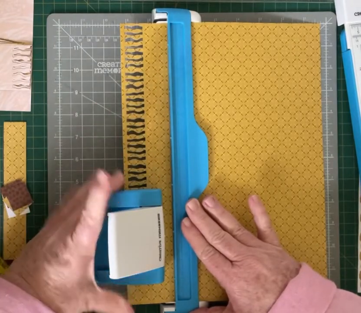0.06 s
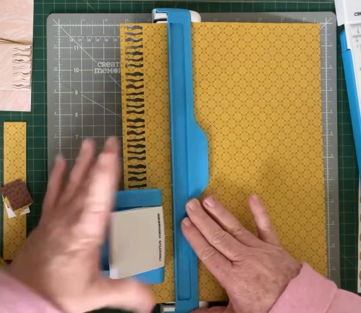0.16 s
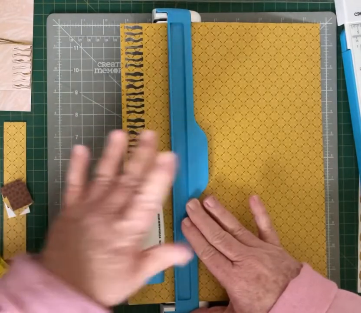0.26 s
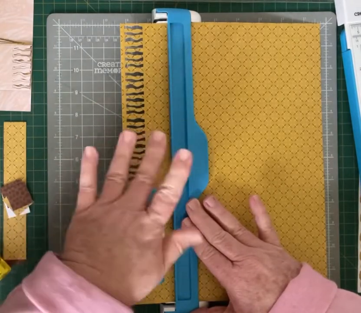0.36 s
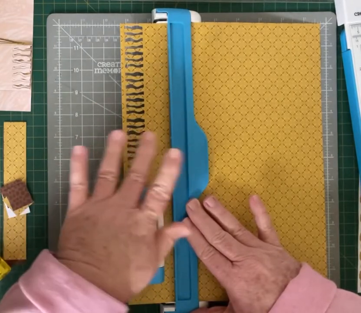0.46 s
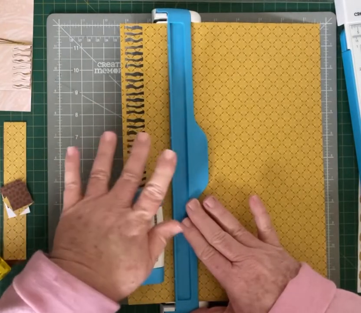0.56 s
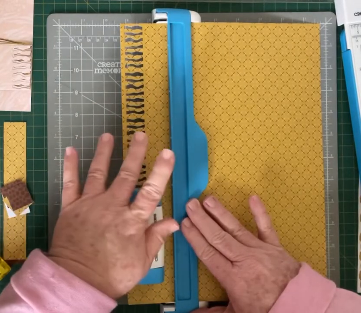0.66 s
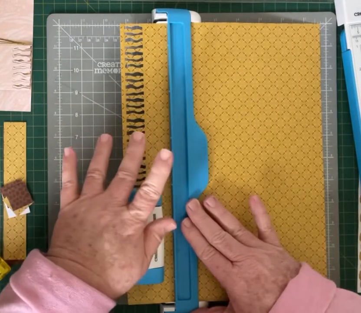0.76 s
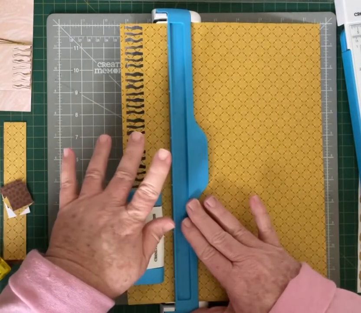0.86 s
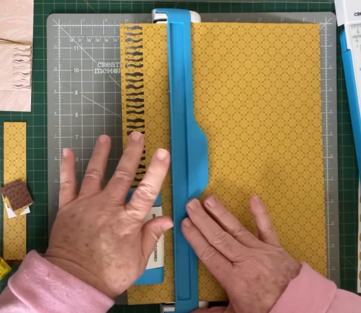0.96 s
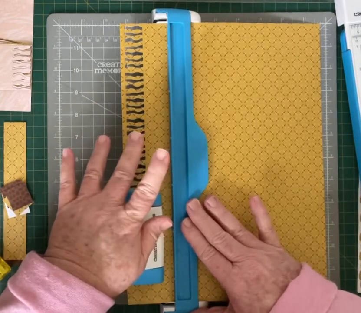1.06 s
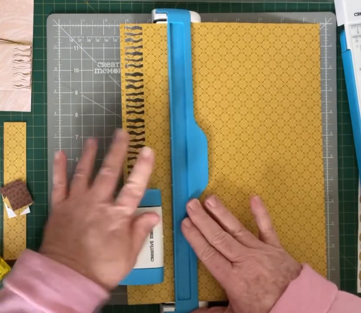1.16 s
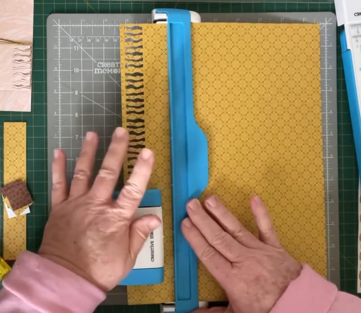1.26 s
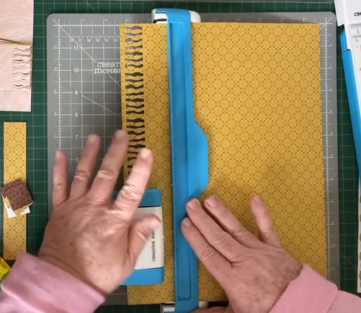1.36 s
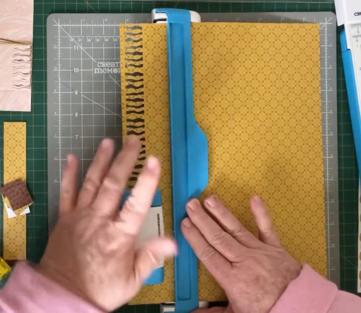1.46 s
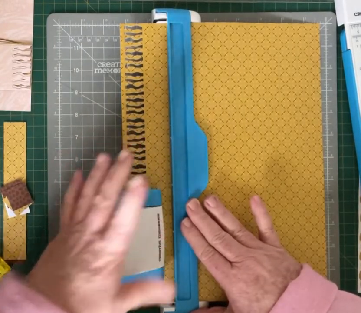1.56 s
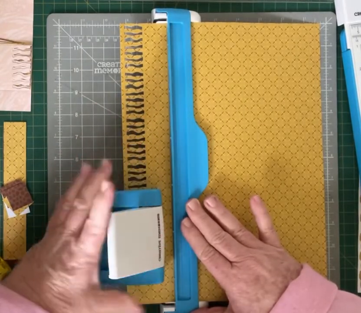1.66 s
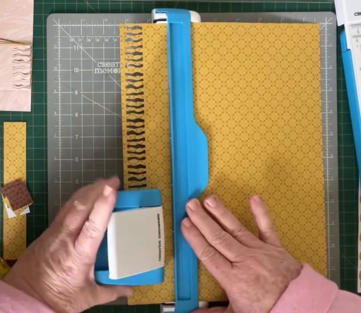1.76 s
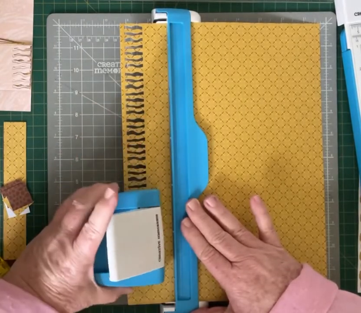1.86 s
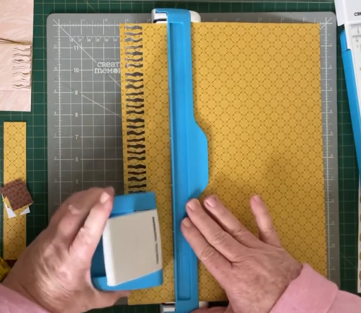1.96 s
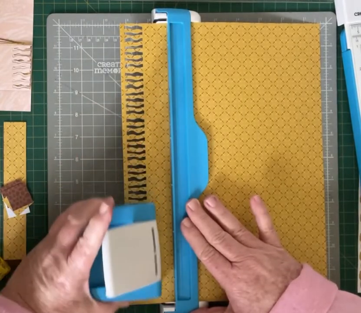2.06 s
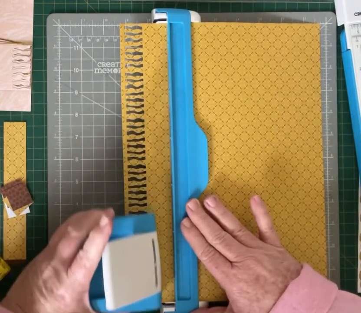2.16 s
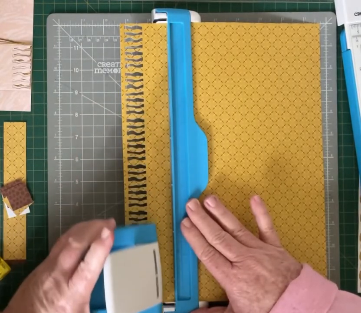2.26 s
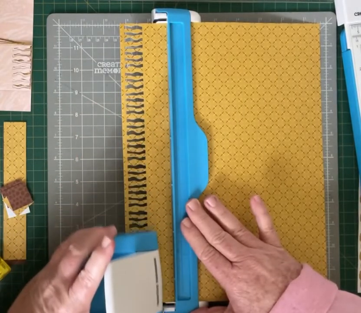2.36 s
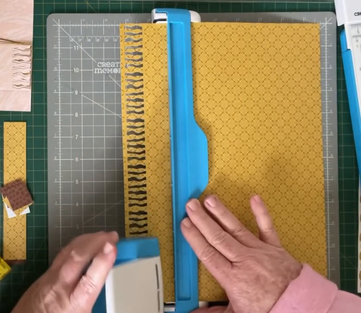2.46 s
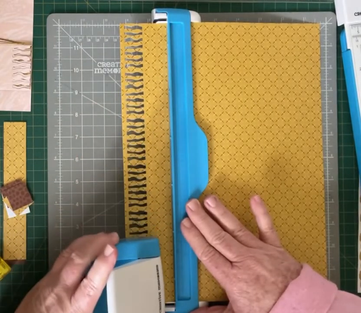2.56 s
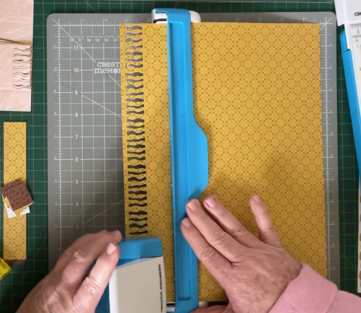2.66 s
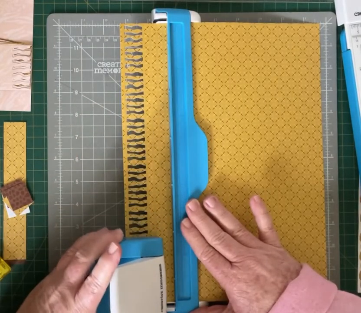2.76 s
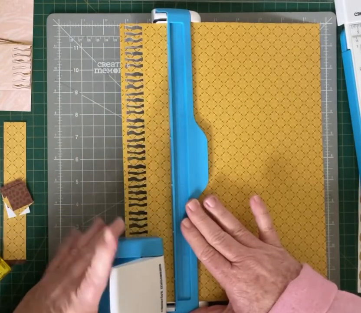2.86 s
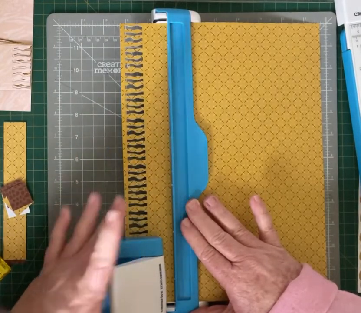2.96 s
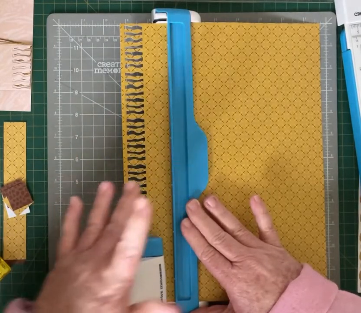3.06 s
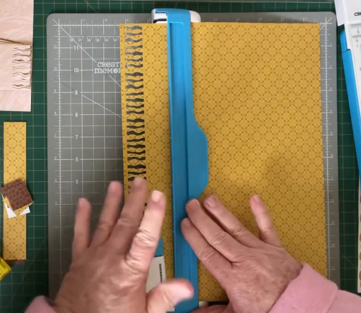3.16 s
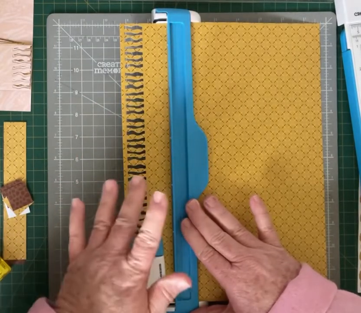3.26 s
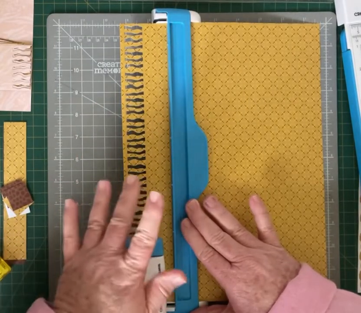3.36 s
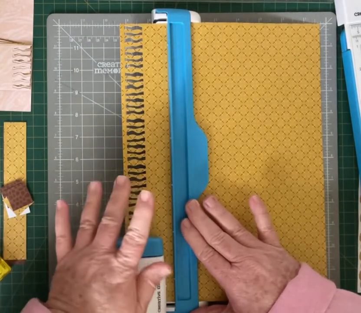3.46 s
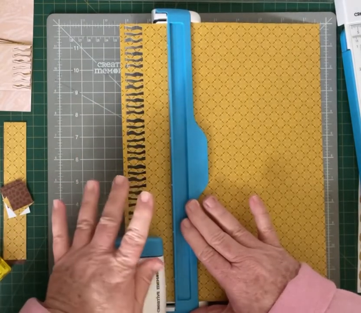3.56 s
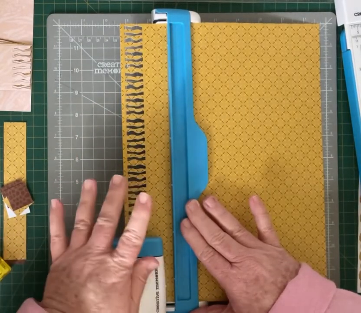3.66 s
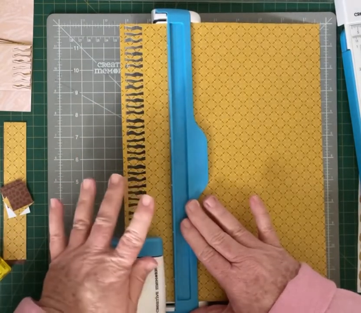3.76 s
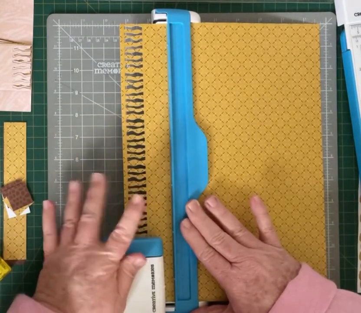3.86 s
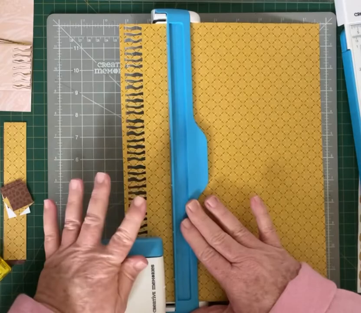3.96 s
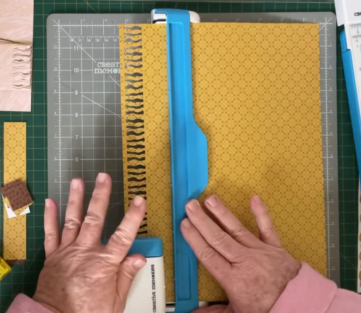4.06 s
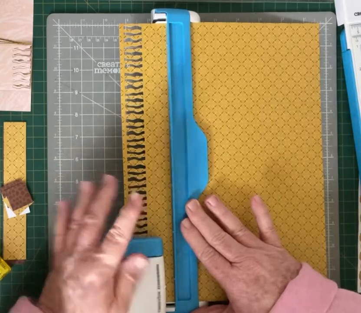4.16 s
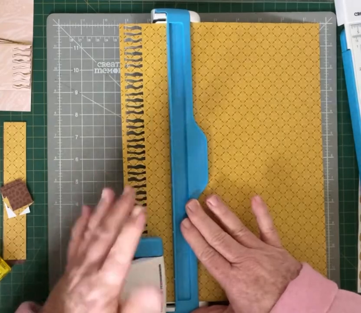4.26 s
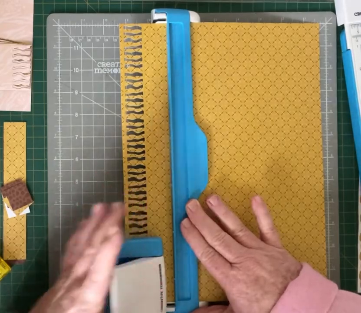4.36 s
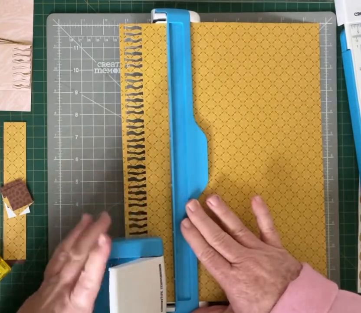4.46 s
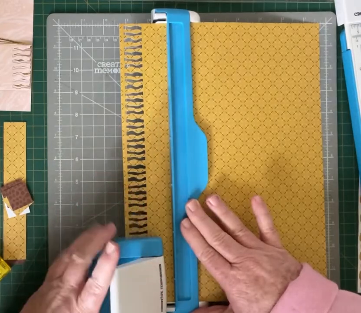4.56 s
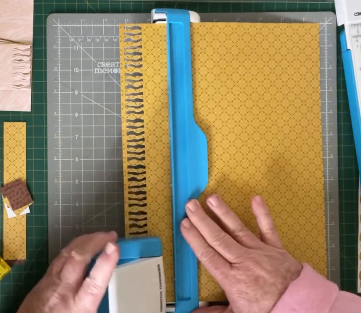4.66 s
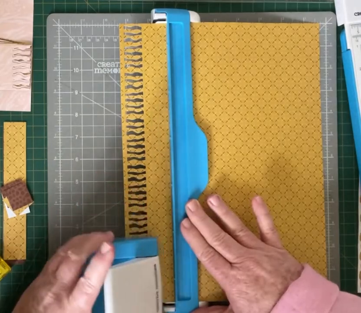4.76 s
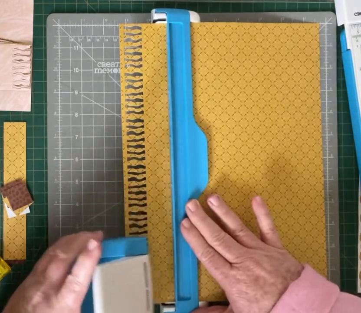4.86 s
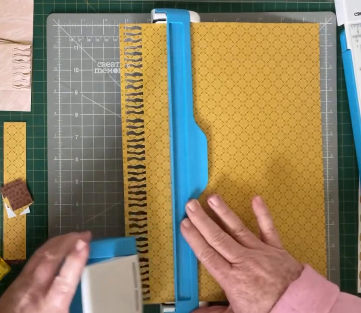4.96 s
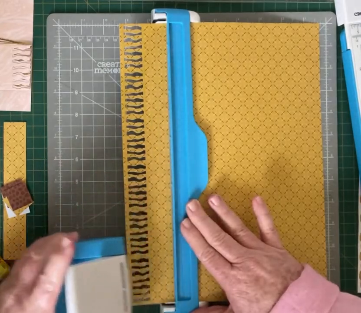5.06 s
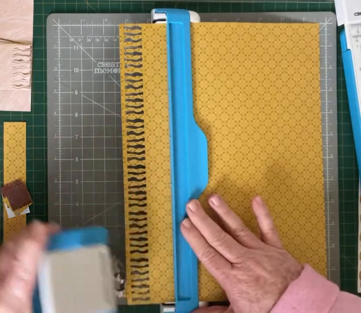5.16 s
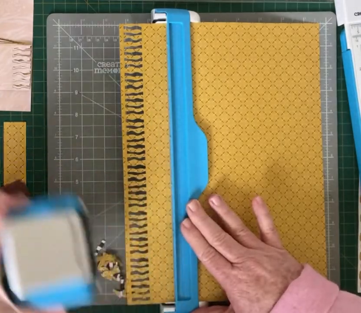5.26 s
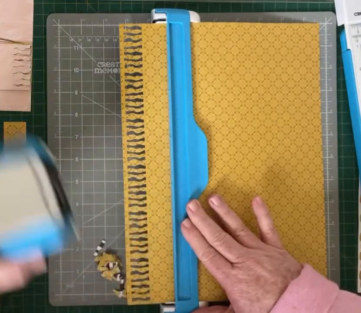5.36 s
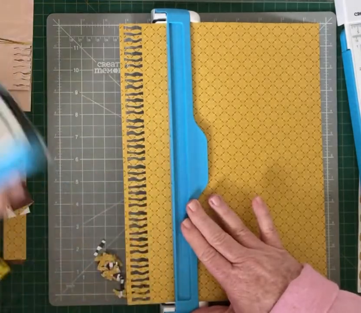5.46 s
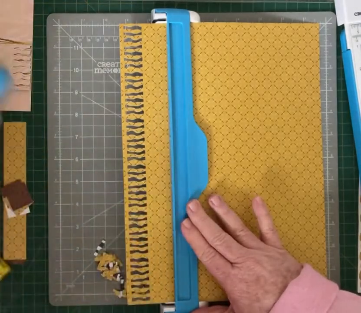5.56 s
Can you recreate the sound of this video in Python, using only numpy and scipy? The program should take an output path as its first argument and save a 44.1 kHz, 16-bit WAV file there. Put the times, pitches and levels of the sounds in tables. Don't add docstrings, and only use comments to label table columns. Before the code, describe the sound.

A plastic hand punch crunches through card twice with loud sharp snaps, amid soft palm knocks, spring ticks, paper rubbing and sliding on a table.

```python
import sys
import numpy as np
from scipy import signal
from scipy.fft import rfft, irfft
from scipy.io import wavfile
from scipy.ndimage import uniform_filter1d

SR = 44100
rng = np.random.default_rng(int(sys.argv[2]) if len(sys.argv) > 2 else 0)


def bounce(signal):
    frames = np.transpose(np.atleast_2d(signal))
    limited = np.clip(frames, -1, 1)
    pcm = np.round(limited * 32767).astype(np.int16)
    wavfile.write(sys.argv[1], SR, pcm)


def invert_db(x):
    u = np.asarray(x, float) / 20
    return 10 ** u


N = 246823

# pitch_hz, level_db
AIR_COLOUR = [(150, -30), (250, -1), (700, -4), (1300, -9), (2500, -14), (5000, -24), (8000, -32),
              (16000, -41)]
# start_s, level_db
SHAKE_LEVEL = [(0.0, -57), (0.28, -61.5), (0.5, -47), (1.05, -58), (1.26, -51.5), (1.431, -46),
               (1.52, -65.5), (1.74, -61.5), (2.09, -53), (2.352, -51.5), (2.93, -60), (3.19, -59.5),
               (3.52, -48), (3.79, -60), (3.98, -49), (4.36, -58.5), (4.52, -57.5), (5.6, -63.5)]
# pitch_hz, level_db
SHAKE_COLOUR = [(15, -71.5), (25, -39.5), (46, -6), (59, 5.5), (75, 6.5), (92, -4.5), (139, 0.5),
                (168, -12.5), (352, -20.5), (452, -19), (500, -23), (650, -52.5), (1100, -120)]
# pitch_hz, t60_s
ROOM_DECAY = [(250, 0.31), (660, 0.17), (1740, 0.23), (4590, 0.26), (12100, 0.2)]
# pitch_hz, level_db
ROOM_COLOUR = [(200, -3), (700, 1.5), (2000, -1.5), (5000, 3.5), (12000, -1)]
# pitch_hz, level_db, t60_s
TABLE_MODES = [(71.4, -11, 0.04), (85, 2, 0.05), (130.7, 5.5, 0.18), (183, -7.5, 0.18), (241, -13, 0.22),
               (346, -5.5, 0.11)]
# start_s, peak_s, end_s, dull_db, bright_db
RUBS = [(0.423, 0.463, 0.43, -45, -51.5), (0.496, 0.516, 0.64, -47.5, -57), (0.528, 0.6, 0.63, -52, -60.5),
        (0.674, 0.694, 0.74, -45.5, -56.5), (0.78, 0.802, 0.89, -55, -57.5), (1.23, 1.23, 1.306, -47, -72),
        (1.296, 1.316, 1.39, -49.5, -58), (1.325, 1.354, 1.36, -47, -49),
        (1.34, 1.385, 1.465, -48.5, -48.5), (2.165, 2.193, 2.18, -49, -56), (2.384, 2.407, 2.47, -54, -57),
        (3.368, 3.39, 3.51, -54.5, -67), (3.485, 3.495, 3.66, -46.5, -56), (3.51, 3.544, 3.55, -49, -54.5),
        (3.588, 3.616, 3.65, -48.5, -53), (3.705, 3.722, 4.1, -59.5, -70), (1.059, 1.07, 1.06, -51, -58),
        (4.054, 4.07, 4.15, -54, -50), (4.085, 4.097, 4.145, -49, -44), (4.095, 4.153, 4.23, -50, -52.5),
        (4.34, 4.36, 4.35, -53.5, -76), (4.53, 4.545, 4.46, -59, -76), (4.63, 4.65, 4.718, -50.5, -75),
        (3.1, 3.11, 3.15, -61.5, -76), (4.953, 4.952, 5.06, -69, -54), (4.958, 4.983, 5, -76, -49),
        (5.01, 5.063, 5.07, -61, -60)]
# pitch_hz, level_db
RUB_COLOUR = [(88, -35), (150, -6.5), (414, -5), (774, 1.5), (1290, -10.5), (1480, 2), (1690, -3),
              (2220, -3.5), (7470, -17), (14000, -29), (16000, -33.5)]
# start_s, time_to_full_speed_s, end_s, dull_db, bright_db
SLIDES = [(0.93, 0.034, 1.17, -70, -74), (1.869, 0.1, 2.47, -59.5, -70), (2.3, 0.082, 2.76, -64, -71),
          (3.4, 0.033, 3.46, -61, -77), (3.9, 0.035, 4.094, -66, -80), (4.699, 0.11, 5.15, -72, -66)]
# pitch_hz, level_db
SLIDE_COLOUR = [(100, -40), (250, -15), (700, -1), (1600, 0), (2500, -4), (4000, -7.5), (7000, -15.5),
                (16000, -33)]
# start_s, fastest_s, end_s
LONG_SLIDES = [
    (1.93, 2.16, 2.35),
    (4.72, 4.85, 5.1),
    (2.5, 2.6, 2.92),
]
# start_hz, end_hz, width_hz, level_db
HOLLOWS = [
    [(1800, 1460, 460, -63), (3000, 4200, 700, -62.5), (5800, 5600, 400, -71)],
    [(1650, 1800, 500, -73.5), (3610, 3600, 440, -77), (5000, 5300, 500, -81), (7300, 8060, 810, -71.5),
     (10400, 9400, 900, -73)],
    [(453, 440, 51.2, -64.5), (700, 680, 63, -70.5)],
]
# start_s, peak_db, pitch_hz
BUMPS = [(1.3925, -32.5, 270), (1.3, -39, 120), (1.123, -17, 140), (1.105, -27, 370), (3.811, -16.5, 150),
         (3.4, -42.5, 260), (4.575, -46.5, 105), (4.644, -39, 316), (4.3, -44, 250), (4.3, -41, 265),
         (3.3, -45, 330), (4.036, -44.5, 210), (3.397, -41, 150), (0.57, -42, 340), (0.53, -41, 150),
         (3.8155, -19, 120)]
# start_s, peak_db, centre_hz, contact_s
TICKS = [(1.278, -40, 7000, 0.00065), (1.2845, -36, 2470, .001), (1.2875, -36.5, 3980, 0.00098),
         (1.3105, -33, 3500, 0.0011), (1.3155, -26.5, 4500, 0.00086), (1.255, -51, 3000, .003),
         (4.045, -46, 5000, 0.0018), (4.0545, -36, 4000, 0.00089), (4.063, -26.5, 3500, .001),
         (4.0695, -32, 3500, .001), (4.126, -37, 6990, .001), (4.16, -47, 10000, .002),
         (4.957, -49, 7810, .002), (4.978, -40, 7500, .002), (5.061, -52, 2593, .001),
         (3.5115, -30, 1700, 0.0011), (4.539, -54.5, 2500, .003), (0.335, -49.5, 2420, 0.0052),
         (0.364, -51, 2500, 0.0037), (0.384, -49.5, 2500, .004), (0.394, -51, 2700, .003),
         (0.41, -53, 2494, 0.0037), (3.575, -45, 700, 0.0045), (3.955, -47, 700, .005),
         (5.342, -64.5, 2000, .003)]
# start_s, peak_db
TOUCHES = [
    (0.299, -50),
    (0.311, -49),
    (0.336, -52),
    (0.364, -55),
    (0.384, -51),
    (0.409, -53),
]
# start_s, peak_db
FLICKS = [
    (4.955, -63.5),
    (4.977, -58),
    (5.059, -58),
]
# start_s, peak_db, shell_hz, edge_db
PRESSES = [(0.439, -39.5, 594, 4.5), (0.452, -36.5, 570, -11), (0.51, -31.5, 1470, -19),
           (0.519, -38.5, 400, -2), (0.536, -28, 1810, -9), (0.567, -42, 1200, 4.5),
           (0.597, -35.5, 1410, -23), (0.671, -34, 1350, -15), (0.695, -37.5, 2020, -16),
           (0.713, -36, 635, -20), (0.804, -39, 1580, -20), (0.821, -34, 810, -7.5),
           (0.868, -44.5, 1540, -3), (0.908, -44, 2200, -10), (0.965, -47, 1600, 1.5),
           (3.339, -45, 602, -10), (3.381, -34, 712, -3), (3.382, -32, 2950, -17), (3.399, -39, 2950, -30),
           (3.432, -41.5, 546, -8), (3.455, -40, 830, -7), (3.486, -39.5, 2700, -8),
           (3.509, -30.5, 1430, -11), (3.534, -38, 1400, -5), (3.554, -39.5, 1353, -17),
           (3.612, -39.5, 1845, 0), (3.627, -39, 1420, -10), (3.718, -44, 523, -31)]
# start_s, peak_db, shell_hz, edge_db
NUDGES = [(1.716, -64, 677, 3.5), (1.765, -43, 786, -19), (2.399, -46, 1160, -6), (2.569, -33, 680, -5.5),
          (3.183, -50, 710, -23.5), (4.521, -55, 650.2, -18.5), (4.538, -44.5, 648, -14),
          (4.625, -48, 808, -2), (5.539, -56.5, 847, -13.5), (4.357, -40.5, 448, -21),
          (4.368, -42, 753.9, -16), (4.645, -37.5, 603, -18), (4.66, -43, 496, -16),
          (4.682, -48.5, 700, -14)]
# start_s, peak_db, shell_hz, edge_db
RETURNS = [(1.234, -30, 730, -27), (1.244, -37, 445, -27), (1.286, -41, 770, -8), (1.31, -37, 2200, 0),
           (1.315, -35.5, 2210, -1), (1.352, -32, 2920, -16), (1.377, -28, 910, -18),
           (1.393, -33.5, 560, -12), (1.418, -34, 750, -13.5), (4.053, -35.5, 790, -4),
           (4.063, -34.5, 860, 1.5), (4.071, -40.5, 790, -14), (4.079, -40.5, 700, -16),
           (4.16, -40.5, 706, -10), (4.092, -39, 1932, 3.5), (4.147, -33.5, 780, -4.5)]
# start_s, peak_db, thump_db, contact_s
SEATS = [
    (2.189, -33.5, -13, 0.0036),
    (2.302, -17.5, -45, 0.0014),
    (2.444, -21, -24.5, 0.003),
    (3.102, -46.5, -13, 0.0041),
    (4.347, -39.5, -7, 0.0041),
    (4.557, -35.5, -17, 0.0033),
    (4.635, -34.5, -7.5, 0.0029),
]
# pitch_hz, level_db
SEAT_COLOURS = [
    [(180, -36.5), (300, -10), (703, 7), (1650, 2), (2210, -3.5), (2690, -15), (3860, -5.5), (15000, -30.5)],
    [(180, -48), (300, -16), (2440, 1.5), (3270, -17), (4320, -4.5), (5010, -5), (7920, -9), (9330, -10.5),
     (15000, -11.5)],
    [(180, -45), (300, -14), (541, -3), (1170, -3.5), (1850, -8.5), (2600, -11), (4250, -18.5),
     (5530, -18.5), (15000, -43)],
    [(180, -42), (300, 3), (2000, 3.5), (2560, 2), (3020, -11), (3440, 0), (15000, -30)],
    [(180, -42), (300, 0.5), (841, -0.5), (2280, -6.5), (4250, -20), (5350, -19), (9330, -35),
     (15000, -72.5)],
    [(180, -29), (300, -25), (577, 3), (1150, -16.5), (2600, -9.5), (3170, -26), (3790, -22),
     (15000, -52.5)],
    [(180, -37), (300, -13.5), (841, 1.5), (1210, -13), (1520, 5), (1850, -7.5), (5260, -20.5),
     (15000, -56)],
]
# pitch_hz, width_hz, level_db
SEAT_RINGS = [
    [(700, 150, 2.5), (1660, 240, -3.5), (2200, 200, -3)],
    [(1600, 410, -3.8), (2600, 330, -2), (4440, 640, -3.5), (5390, 180, -9), (6380, 200, -6),
     (7760, 190, -4)],
    [(560, 130, -5), (830, 220, 4), (1140, 76, -1), (2600, 170, -11), (5660, 210, -20)],
    [(1180, 280, -4), (2580, 360, 1), (3500, 170, -5), (5420, 120, -10)],
    [(840, 170, 0.5), (1470, 159.7, -2), (2190, 220, -7), (5230, 200, -16.5)],
    [(635, 110, 1), (1660, 110.5, -8), (2570, 130, -9), (3730, 229, -21)],
    [(850, 180, 1), (1476, 140, -3), (2240, 170, -5), (5200, 180, -20)],
]
# start_s, level_db, boom_db
BITES = [
    (1.073, -24, -1.5),
    (1.083, -27, -5),
    (1.0945, -23, -6),
    (1.103, -27, -4),
    (3.767, -24, -11.5),
    (3.775, -28, -6.5),
    (3.781, -27.5, -3.5),
    (3.7895, -26, 6),
    (3.795, -29, 8),
]
# pitch_hz, level_db
BITE_COLOUR = [(120, -44), (200, -14.5), (558, 1), (1100, -10), (1250, -4), (1480, -9.5), (2860, -11),
               (5130, -23), (6170, -19.5), (8420, -28), (16000, -31.5)]
# pitch_hz, level_db, t60_s
BASE_MODES = [(460, 0, 0.0078), (594, -5, 0.022), (1150, -7, 0.013)]
# start_s, peak_db, thump_db, thump_delay_s, rattle_s
SNAPS = [
    (1.115, -3, -9, 0.008, 0.0055),
    (3.804, 0, -14, 0.0088, 0.0066),
]
# pitch_hz, level_db
SNAP_COLOURS = [
    [(180, -33.5), (300, -8.5), (700, 0), (1050, -11), (2100, -6), (2900, -8.5), (4440, -11), (5340, -14.5),
     (6410, -7), (6960, -15.5), (7820, -14), (14200, -29.5), (16000, -37)],
    [(180, -44.5), (300, -11), (700, -8), (1530, -10.5), (2170, 0.5), (3760, -11), (4830, -11),
     (5340, -14.5), (6100, -11), (7820, -14.5), (16000, -33)],
]
# pitch_hz, level_db, t60_s
SNAP_RINGS = [
    [(673, 3, 0.08), (1220, -17, 0.05), (2290, -20, 0.05), (2940, -18, 0.07), (4447, -24, .06),
     (6300, -26, .07)],
    [(703, -1, 0.084), (2010, -4.5, 0.075), (2098, -4, 0.09), (3200, -8, 0.088), (4700, -15.5, .11),
     (4888, -12, 0.11), (6200, -22, .07)],
]
# start_s, peak_db
BLOWS = [(1.1161, -5), (1.117, -3.5), (1.118, -4), (1.1206, -13.5), (1.1227, -14.5), (3.805, -3),
         (3.8058, -4.5), (3.807, -4), (3.8083, -5), (3.8136, -14.5), (3.8254, -20)]


def evened(x):
    return x / np.sqrt(np.mean(x ** 2) + 1e-20)


def peaked(x):
    return x / (abs(x).max() + 1e-20)


def read(points, hz):
    f, value = np.transpose(points)
    return np.interp(np.log(hz + 1), np.log(f + 1), value)


def add(mix, s, sound):
    part = mix[round(s * SR):][:len(sound)]
    part += sound[:len(part)]


def coloured(x, spectrum):
    level_db = read(spectrum, abs(np.fft.fftfreq(8192, 1 / SR)))
    log_gain = np.log(invert_db(np.maximum(level_db, -100)))
    taps = np.fft.ifft(np.exp(np.conj(signal.hilbert(log_gain)))).real[:4096]
    return signal.oaconvolve(x, taps)[:len(x)]


def band(x, lo_hz, hi_hz, order=3):
    return signal.sosfilt(signal.butter(order, [lo_hz, hi_hz], "band", fs=SR, output="sos"), x)


def split(full, power):
    low = signal.oaconvolve(full, signal.firwin(15, 4500, fs=SR), "same")
    return np.sqrt(power[0]) * evened(low) + np.sqrt(power[1]) * evened(full - low)


def patchy(x, patch_db, order):
    z = signal.stft(x, nperseg=256, noverlap=192)[2]
    patches = uniform_filter1d(rng.standard_normal(z.shape[::-1]), order, 0)
    patches = evened(uniform_filter1d(patches, 4, 1))
    return signal.istft(z * invert_db(patch_db * patches.T), nperseg=256, noverlap=192)[1][:len(x)]


def contact(noise, contact_s):
    u = np.arange(noise.shape[-1]) / SR / np.clip(contact_s, .0003, .03)
    return noise * u ** .55 * np.exp(-u ** 1.15)


def burst(shape):
    x = rng.standard_normal(len(shape)) * shape
    for _ in range(2):
        z = rfft(x)
        x = irfft(z / (abs(z) + 1e-12), len(x))
        x = x * shape / np.sqrt(abs(uniform_filter1d(x ** 2, 60)) + 1e-12)
    return x


def ring(modes, seconds):
    t = np.arange(round(seconds * SR)) / SR
    return sum(invert_db(db - 60 * t / t60) * np.sin(2 * np.pi * hz * t) for hz, db, t60 in modes)


def air():
    return invert_db(-71) * evened(coloured(rng.standard_normal(N), AIR_COLOUR))


def shake():
    lumps = invert_db(1.5 * evened(uniform_filter1d(rng.standard_normal(N), 1500)))
    level = invert_db(np.interp(np.arange(N) / SR, *np.transpose(SHAKE_LEVEL)))
    return level * evened(coloured(rng.standard_normal(N) * lumps, SHAKE_COLOUR))


def room(x):
    taps = rng.choice([-1., 0, 0, 1.], (3, SR // 3))
    hz, t, z = signal.stft(taps, SR, nperseg=256)
    level_db = read(ROOM_COLOUR, hz)[:, None] - 60 * t / read(ROOM_DECAY, hz)[:, None]
    tails = signal.istft(z * invert_db(level_db), SR, nperseg=256)[1]
    tails *= np.clip((np.arange(tails.shape[1]) / SR - .002) / 0.0044, 0, 1)
    turn = np.arange(N) / SR * 47 + np.arange(3)[:, None] * np.pi / 3
    shares = np.sqrt(2 / 3) * np.cos(turn)
    return signal.oaconvolve(x * shares, tails / np.linalg.norm(tails[0]), axes=1)[:, :N].sum(0)


def thump(push_s):
    push = np.hanning(round(push_s * SR))
    return peaked(signal.oaconvolve(ring(TABLE_MODES, 0.37), push))


def bumps():
    out = np.zeros(N)
    for s, db, hz in BUMPS:
        jolt = band(ring([(hz, 0, 3.5 / hz)], .08), 60, 1500, order=1)
        add(out, s, -invert_db(db) * peaked(jolt))
    return out


def rubs():
    clumps = evened(uniform_filter1d(rng.standard_normal(N), 160))
    slips = rng.standard_normal(N) * invert_db(1.5 * rng.exponential(1, N) + 2 * clumps)
    t = np.arange(0, N / SR + .002, .001)
    power = np.zeros((2, len(t)))
    for start, top, end, *db in RUBS:
        times = [start - .01, start, top, end, end + .03]
        stroke_db = np.interp(t, times, [-60, -17.5, 0, -17.5, -60])
        power += np.outer(invert_db(db), invert_db(stroke_db)) ** 2
    power = np.array([np.interp(np.arange(N) / SR, t, row) for row in power])
    return patchy(split(coloured(slips, RUB_COLOUR), power), 2.8, order=5)


def slides():
    t = np.arange(0, N / SR + .002, .001)
    power = np.zeros((2, len(t)))
    for start, swell_s, end, *db in SLIDES:
        slowing_s = 0.25 * (end - start)
        held = np.clip(np.minimum((t - start) / swell_s, (end - t) / slowing_s), 0, 1)
        power += np.outer(invert_db(db), held) ** 2
    power = np.array([np.interp(np.arange(N) / SR, t, row) for row in power])
    return patchy(split(coloured(rng.standard_normal(N), SLIDE_COLOUR), power), 1.5, order=12)


def hollows():
    out = np.zeros(N)
    for (start, top, end), bands in zip(LONG_SLIDES, HOLLOWS):
        t = np.arange(start, end, 1 / SR)
        speed = np.interp(t, [start, top, end - .04, end], [0.32, 0.99, 0.66, 0])
        for from_hz, to_hz, width_hz, db in bands:
            turn = np.exp(2j * np.pi * np.cumsum(np.linspace(from_hz, to_hz, len(t))) / SR)
            r = np.exp(-np.pi * width_hz / SR)
            hiss = signal.lfilter([1], np.convolve([1, -r], [1, -r]), rng.standard_normal(len(t)) / turn)
            add(out, start, invert_db(db) * speed * evened((turn * hiss).real))
    return patchy(out, 1.5, order=30)


def ticks():
    out = np.zeros(N)
    for s, db, hz, contact_s in TICKS:
        force = burst(contact(np.ones(1500), contact_s))
        add(out, s, invert_db(db) * peaked(band(force, 0.68 * hz, min(1.47 * hz, SR / 3), order=2)))
    return out


def knock(db, hz, clack_db, tick_db, contact_s, table):
    force = contact(rng.standard_normal((3, 4000)), contact_s)
    shell = ring([(hz, 0, 7 / hz), (1.45 * hz, -5, 5 / hz)], .04)
    rung = signal.oaconvolve(force[0], shell)[:len(force[0])]
    body = peaked(band(rung, 0.42 * hz, 5.0 * hz))
    clack = invert_db(clack_db - 1.5) * peaked(band(force[1], 1300, 3800, order=4))
    tick = invert_db(tick_db + 6.5) * peaked(band(force[2], 2700, 9400, order=3))
    sound = invert_db(-25.5) * table
    add(sound, 0, body + clack + tick)
    return invert_db(db + 0.5) * sound


def knocks():
    # start_s, peak_db, shell_hz, clack_db, tick_db
    rows = [(s, db, hz, edge_db, edge_db - 18.5) for s, db, hz, edge_db in PRESSES + NUDGES]
    rows += [(s, db, hz, edge_db, edge_db - 9) for s, db, hz, edge_db in RETURNS]
    rows += [(s, db, 660, -14, -50) for s, db in TOUCHES]
    rows += [(s, db, 3080, -14, 9) for s, db in FLICKS]
    table = thump(0.013)
    out = np.zeros(N)
    for s, db, hz, clack_db, tick_db in rows:
        contact_s = .0027 * (1000 / hz) ** 0.12
        add(out, s, knock(db, hz, clack_db, tick_db, contact_s, table))
    return out


def seatings():
    out = np.zeros(N)
    for (s, db, thump_db, contact_s), colour, peaks in zip(SEATS, SEAT_COLOURS, SEAT_RINGS):
        force = burst(contact(np.ones(4000), contact_s))
        add(out, s, invert_db(db + 5) * peaked(coloured(force, colour)))
        modes = [(hz, level + 20 * np.log10(width), 2.2 / width) for hz, width, level in peaks]
        rung = signal.oaconvolve(force, ring(modes, .03))
        add(out, s, invert_db(db + 0.4) * peaked(band(rung, 460, 13500)))
        add(out, s + 0.0022, invert_db(db + thump_db) * thump(0.0014))
    return out


def crunch():
    out, t = np.zeros(N), np.arange(0, .045, 1 / SR)
    rise_s, fade_s = 0.0027, 0.011
    for s, db, boom_db in BITES:
        tears = rng.standard_normal(len(t)) * invert_db(2.5 * rng.exponential(1, len(t)))
        boom = evened(signal.oaconvolve(tears, ring(BASE_MODES, .03))[:len(t)])
        sound = evened(coloured(tears, BITE_COLOUR)) + invert_db(boom_db) * boom
        left_s = min(snap[0] - s for snap in SNAPS if snap[0] > s)
        bite = np.minimum(t / rise_s, np.exp(-(t - rise_s) / fade_s))
        add(out, s, invert_db(db) * sound * bite * np.clip((left_s - t) / .002, 0, 1))
    return patchy(out, 1.7, order=4)


def snaps():
    out, t, u = np.zeros(N), np.arange(3000) / SR, np.arange(8000) / SR
    for (s, db, thump_db, late_s, rattle_s), colour, modes in zip(SNAPS, SNAP_COLOURS, SNAP_RINGS):
        settling = invert_db(-12.5) * np.exp(-(t / (1.6 * rattle_s)) ** 3)
        blows = burst(np.minimum(t / .0014, 1) * (np.exp(-(t / rattle_s) ** 3) + settling))
        add(out, s, invert_db(db - 2.5) * peaked(coloured(blows, colour)))
        for at, blow_db in BLOWS:
            if abs(at - s) < .1:
                blow = burst(contact(np.ones(3000), .0004))
                add(out, at, invert_db(blow_db) * peaked(coloured(blow, colour)))
        damped = [(hz, level, min(t60, .11)) for hz, level, t60 in modes]
        add(out, s, invert_db(db - 15.5) * peaked(signal.oaconvolve(blows, ring(damped, .4))))
        add(out, s + .02, invert_db(db - 23) * peaked(signal.oaconvolve(blows, ring(damped[1:], .4))))
        chatter = rng.standard_normal(len(u)) * np.minimum(u / 0.0078, 1) * np.exp(-u / 0.025)
        add(out, s, invert_db(db - 19) * patchy(peaked(coloured(chatter, colour)), 2.9, order=4))
        add(out, s + late_s, -invert_db(db + thump_db) * thump(0.0022))
    return out


def scene():
    near = bumps() + rubs() + slides() + hollows() + ticks() + knocks() + seatings() + crunch() + snaps()
    return (near + invert_db(-10) * room(near) + shake() + air())[None]


def low_pass(x):
    return signal.sosfilt(signal.butter(12, 16650, fs=SR, output="sos"), x)


def record(dry):
    x = signal.sosfilt(signal.butter(5, 60, "high", fs=SR, output="sos"), dry)
    x = x / (1 + (abs(x) / .9) ** 6) ** (1 / 6)
    x = signal.sosfilt(signal.butter(16, 15700, "low", fs=SR, output="sos"), x)
    return low_pass(x)


dry = scene()
out = record(dry)
bounce(out)
```